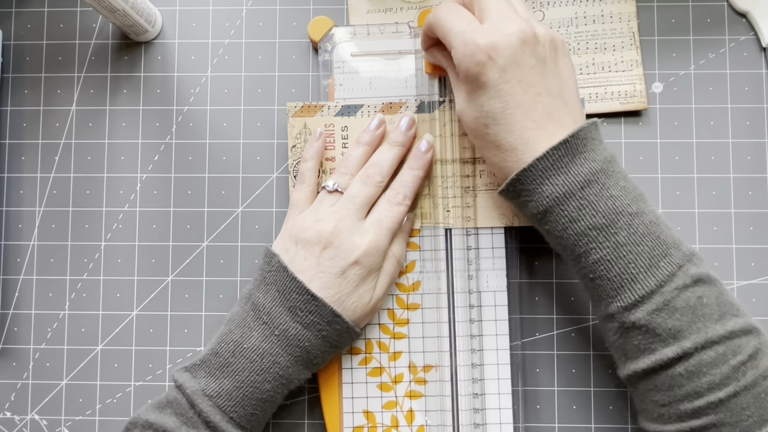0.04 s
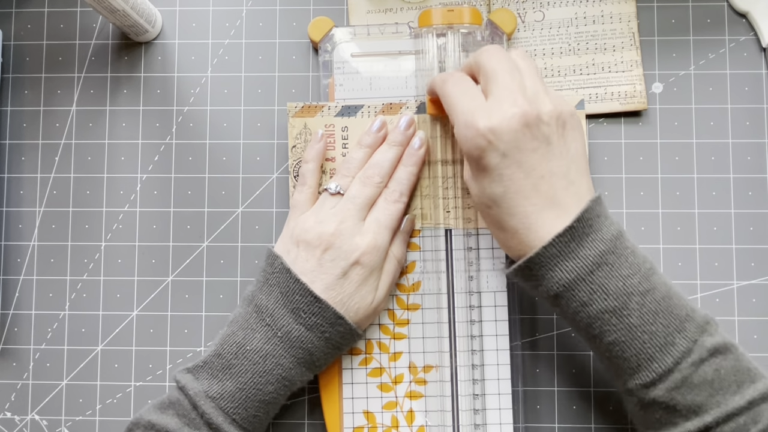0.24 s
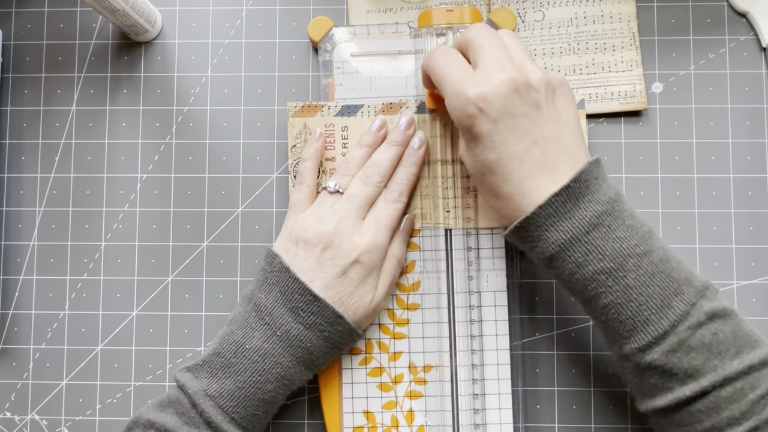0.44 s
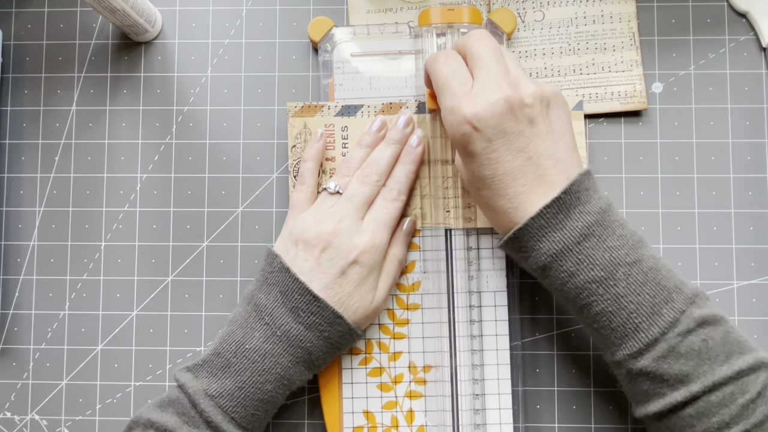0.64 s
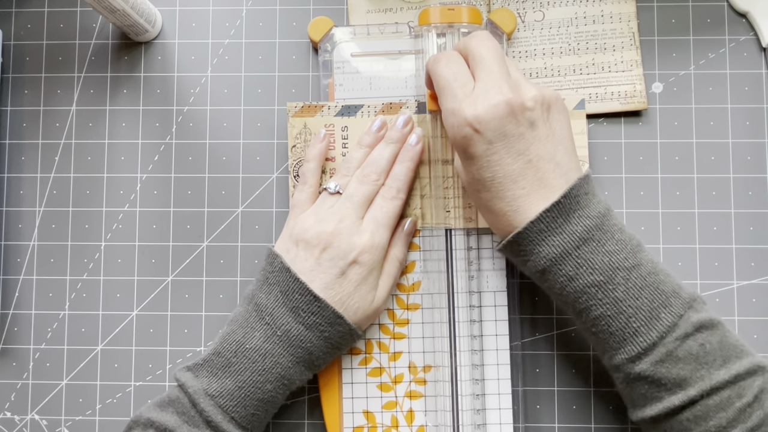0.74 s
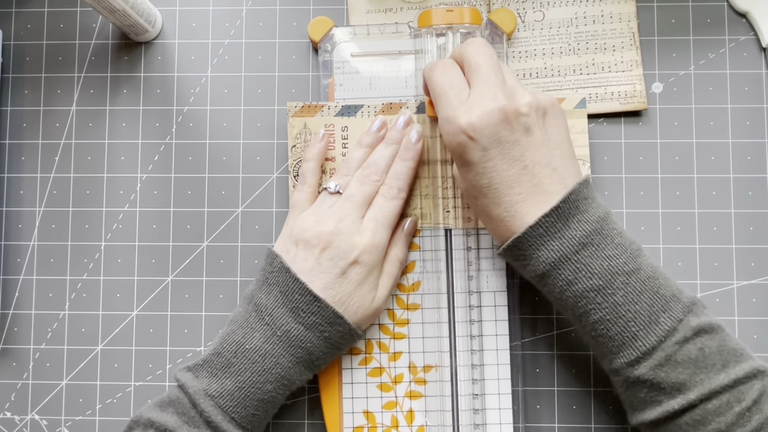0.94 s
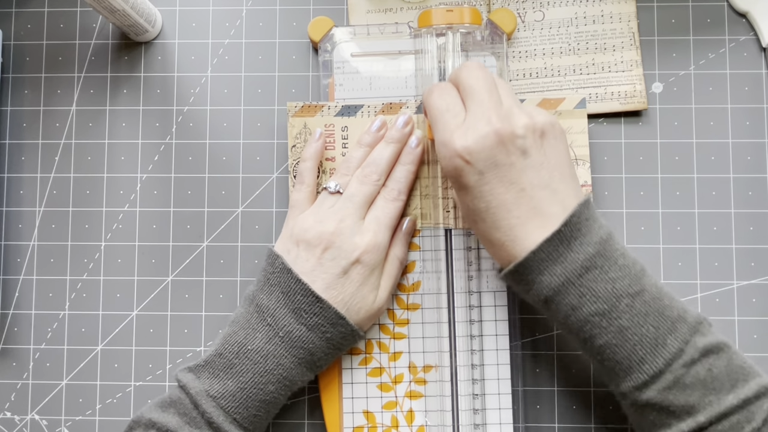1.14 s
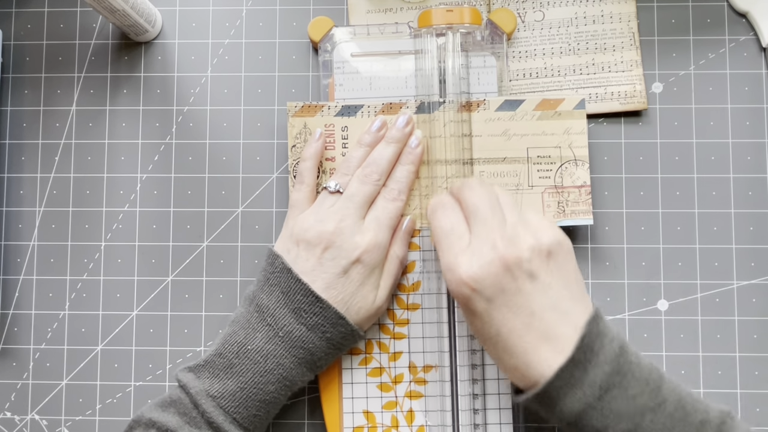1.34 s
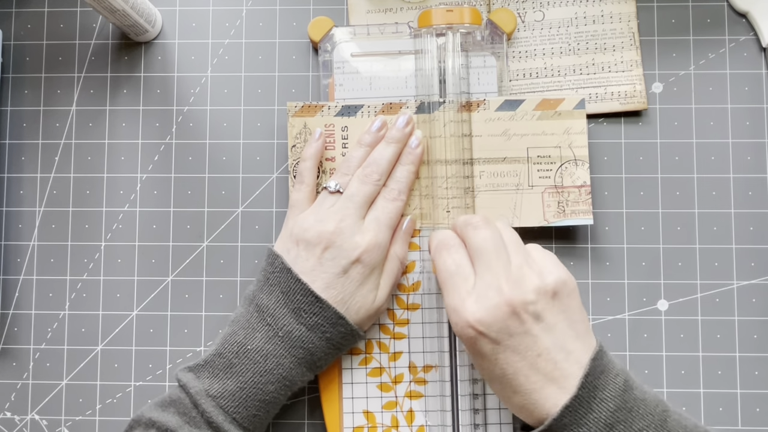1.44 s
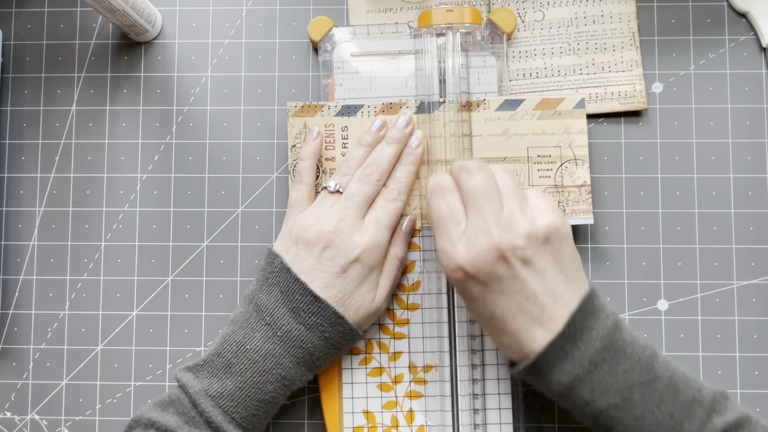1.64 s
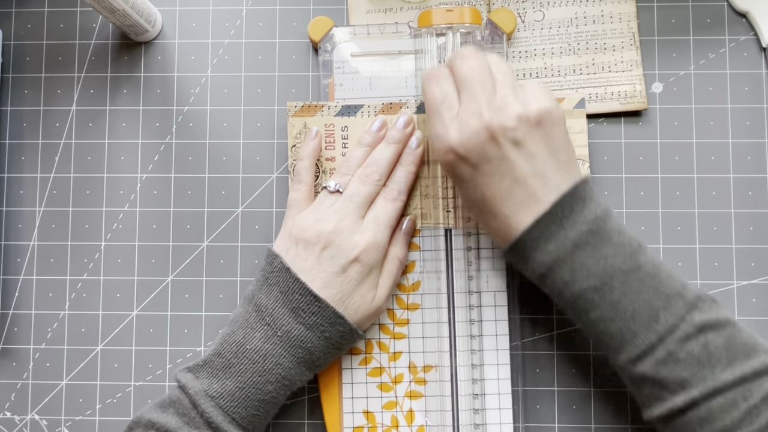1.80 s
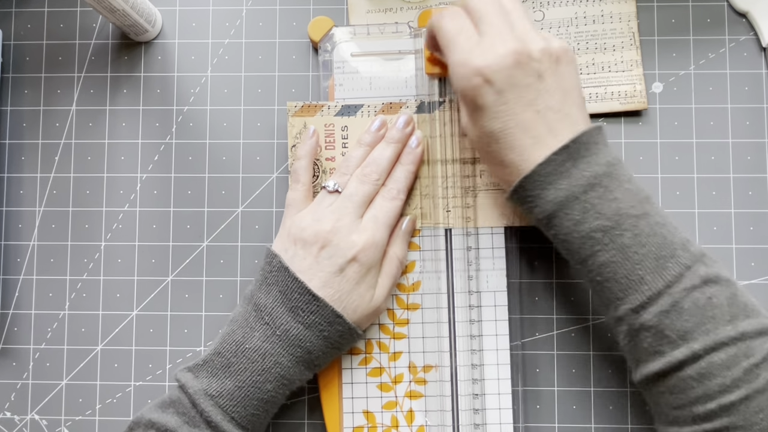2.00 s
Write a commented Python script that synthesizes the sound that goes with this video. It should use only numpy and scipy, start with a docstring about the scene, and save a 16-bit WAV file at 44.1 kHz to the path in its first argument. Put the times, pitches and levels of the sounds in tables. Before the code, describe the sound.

A paper trimmer's plastic carriage clacks into place with scattered knocks, then rasps through a sheet in one swelling, hissing stroke, and rattles back with more knocks; close stereo in a quiet room.

```python
"""Paper trimmer on a craft table

Close stereo. Fingers knock the blade carriage into place; it rasps down its rail through a sheet of
paper and slides back rattling. Knocks, slips and rattles excite ringing modes of the plastic base; jolts
ring the table top and send a falling bending wave through it. Filtered grains make the hiss of blade
and paper, noise bursts the dry clicks; sparse reflections and a low room rumble surround it all."""
import sys
import numpy as np
from scipy import signal
from scipy.fft import rfft, irfft, next_fast_len
from scipy.io import wavfile
from scipy.ndimage import uniform_filter1d

SR = 44100
rng = np.random.default_rng(int(sys.argv[2]) if len(sys.argv) > 2 else 0)


def amplitude_ratio(level_db):
    """Convert a level in decibels to the matching linear amplitude (field) ratio."""
    exponent = np.asarray(level_db, float) / 20
    return 10 ** exponent


def digitize_waveform(pressure):
    """Quantize a signal to 16-bit integers and store it at the path in sys.argv[1].

    Rows of a 2-D input are taken as channels; values are limited to [-1, 1].
    """
    field = np.atleast_2d(pressure).T
    bounded = np.clip(field, -1, 1)
    quanta = np.round(bounded * 32767).astype(np.int16)
    wavfile.write(sys.argv[1], SR, quanta)


N = 91110

# Room rumble spectrum, before scaling to ROOM_DB: freq_hz, density_db
ROOM_SPECTRUM = [(20, -22), (50, 9.5), (120, 0), (170, -3.5), (600, -20), (1000, -40), (6000, -42)]
ROOM_DB, ROOM_APART_DB = -57, -15  # rms of the shared rumble; each side's own rumble relative to it

# Dry bright clicks, perhaps a nail or paper edge on plastic: start_s, level_db (before filtering)
CLICKS = [(0.3, -46.5), (0.55, -45), (0.58, -43), (0.684, -49.5), (.951, -46)]
CLICK_LOW_HZ, CLICK_TOP_HZ, CLICK_T60_S = 2500, 10200, 0.025  # band edges, decay

# Jolts of the table top: start_s, ringing_db, bending_wave_db
THUDS = [(.162, -45, -50), (.19, -38.5, -40), (.393, -51.5, -44), (0.489, -53, -43), (.581, -49, -48),
         (.628, -45.5, -41.5), (.845, -41.5, -40), (1.548, -45, -45), (1.826, -45, -39), (2.0, -47, -50)]
# Table-top modes: pitch_hz, relative_level_db, t60_s
TABLE_MODES = [(115, 4, 0.4), (192.4, 7.5, 0.096)]
TABLE_DETUNE = 0.048  # random relative pitch spread from jolt to jolt
BEND_FROM_HZ, BEND_TO_HZ, BEND_S = 890, 196, 0.00395  # glide of the bending wave and its time constant

# Plastic base modes: pitch_hz, relative_level_db, t60_s
BASE_MODES = [(427, -24, 0.015), (538.6, -16.5, 0.061), (696, 7, 0.011), (794.7, -1, 0.016), (963, 1, 0.01),
              (1237.6, 1.5, 0.016), (1915, 1, 0.024), (2920, -16, 0.019)]
RISE_CYCLES = 2.64  # modes swell over a few cycles, so low ones come late
RASP_HZ = 756  # centre of the modes most excited

# Knocks of carriage and rail: start_s, body_peak_db, tick_db (before colouring)
KNOCKS = [(0.013, -41.5, -69.5), (0.157, -23, -47), (0.18, -21.5, -43), (0.274, -35, -64.5),
          (0.33, -26.5, -67), (0.389, -36, -58), (0.432, -42, -64.5), (0.455, -38, -70),
          (0.485, -32.5, -60), (0.576, -35.5, -85), (0.622, -34.5, -57.5), (0.837, -21, -44.5),
          (0.86, -23.5, -43), (0.889, -22.5, -51.5), (1.542, -30, -74), (1.577, -39, -54),
          (1.643, -38, -99), (1.695, -28, -66), (1.731, -42, -67), (1.76, -26, -95), (1.801, -32.5, -61),
          (1.824, -22.5, -65), (1.96, -44, -76), (2.002, -26.5, -55.5), (2.028, -33.5, -52)]
# Colour of the knock ticks: freq_hz, gain_db
TICK_COLOUR = [(1500, 24), (3000, 19.5), (6500, 12), (15500, -9)]
TICK_T60_S, TICK_RISE_S = 0.024, 0.00071
CONTACT_S, BOUNCE_S = 0.00018, 0.003004  # width of each push, earliest bounce
SPOT_DB = 4.5  # random spread of each mode's level from knock to knock
DULLING_DB = 0.58  # fall per octave squared above RASP_HZ, per dB that the tick lies under the body

# Sliding carriage: time_s, base_rumble_db, blade_and_paper_hiss_db
SLIDE = [(0, -61, -66.5), (0.144, -66.5, -54.5), (.22, -54.5, -76), (.52, -66, -85), (0.687, -60.5, -69.5),
         (0.768, -94, -90), (0.833, -56, -58), (0.941, -55, -65), (1.103, -43.5, -48), (1.199, -40.5, -41),
         (1.354, -35, -38.5), (1.356, -48, -47), (1.41, -51, -53.5), (1.464, -71.5, -76), (1.529, -61, -60),
         (1.598, -49, -53), (1.742, -47.5, -46.5), (1.902, -58.5, -57), (1.98, -64, -72.5),
         (2.066, -58, -63)]
# Colour of the blade and paper hiss: freq_hz, gain_db
HISS_COLOUR = [(1000, 1), (2000, -0.5), (3200, -2), (6500, -4), (7700, 2), (10500, -7), (13500, -11),
               (15800, -14)]
CUT_START_S, CUT_END_S = .83, 1.5
SLIPS_PER_S, SLIP_SPREAD_DB, RASP_FOCUS_DB = 5000, 1.5, 9.5  # focus: fall per octave squared off RASP_HZ
RATTLES_PER_S, RATTLE_SPREAD_DB, RATTLE_FOCUS_DB = 150, 4, 16
TABLE_SHAKE_DB = -12.5  # table response relative to base response during the cut
JUDDER_HZ, JUDDER_DB, FLICKER_DB = 75, 1, 1.76  # one wandering curve: its speed, depth on slips and on hiss
FIBRES_PER_S, FIBRE_SPREAD_DB, PATCH_DB = 15000, -3.5, 4.5

# Colour of nearby reflections: freq_hz, gain_db
ECHO_COLOUR = [(1000, -13), (2500, -4), (5000, -2), (6400, 0), (7600, -20)]
ECHO_T60_S = 0.18
# Phase by which the left side leads: freq_hz, lead_rad
LEFT_LEAD = [(0, 0), (1800, .45), (4000, 1.7), (5400, 1.5), (6300, 0), (7600, -2.95), (9000, -3.35),
             (10700, -6.05), (12600, -6.5), (14300, -9.42)]
# Left level minus right level: freq_hz, difference_db
LEFT_OVER_RIGHT = [(2000, 1.5), (5000, 2.5), (8000, 0)]


def evened(x):
    """Scales to rms 1."""
    return x / np.sqrt(np.mean(x ** 2) + 1e-20)


def coloured(x, gain):
    """Applies gain(Hz) over the whole spectrum."""
    size = next_fast_len(x.shape[-1] + 2048)
    spectrum = rfft(x, size) * gain(np.fft.rfftfreq(size, 1 / SR))
    return irfft(spectrum, size)[..., :x.shape[-1]]


def shape(points):
    """Gain curve through (Hz, dB) points, straight in dB over log frequency."""
    f, db = np.transpose(points)
    return lambda hz: amplitude_ratio(np.interp(np.log(hz + 1), np.log(f + 1), db))


def ring(hz, db, t60):
    """Sum of sine modes that swell and die."""
    t = np.arange(SR // 4)[:, None] / SR
    decay = amplitude_ratio(db - 60 * t / np.maximum(t60, .003))
    swell = 1 - np.exp(-t * hz / RISE_CYCLES)
    return (decay * swell * np.sin(2 * np.pi * hz * t)).sum(1)


def grains(per_s, spread_db):
    """Random single-sample impulses of either sign and uneven strength, rms 1."""
    present = rng.random(N) < per_s / SR
    strength = amplitude_ratio(spread_db * np.minimum(rng.exponential(1, N), 5))
    return evened(present * rng.choice([-1., 1.], N) * strength)


def wander(hz):
    """Low-passed noise of rms 1, a randomly drifting curve."""
    return evened(coloured(rng.standard_normal(N), lambda f: 1 / (1 + (f / hz) ** 2)))


def add(mix, s, sound):
    """Mixes a sound in at s seconds."""
    part = mix[round(s * SR):][:len(sound)]
    part += sound[:len(part)]


def room_rumble():
    """Three independent stretches of low noise: left, right and shared."""
    return amplitude_ratio(ROOM_DB) * evened(coloured(rng.standard_normal((3, N)), shape(ROOM_SPECTRUM)))


def echoes(x):
    """Reflections as sparse decaying taps of random sign, other ones for each side."""
    taps = np.zeros((2, SR // 4))
    slots = np.arange(60, SR // 4 - 20, 20)
    at = slots + rng.integers(0, 20, (2, len(slots)))
    sizes = rng.choice([-1., 1.], at.shape) * amplitude_ratio(-60 * at / SR / ECHO_T60_S)
    np.put_along_axis(taps, at, sizes, 1)
    taps /= np.linalg.norm(taps[0])
    return coloured(signal.fftconvolve(x[None], taps, axes=1)[:, :N], shape(ECHO_COLOUR))


def clicks():
    """Very short, band-limited noise bursts that die exponentially."""
    out, t = np.zeros(N), np.arange(1024) / SR
    for s, db in CLICKS:
        add(out, s, amplitude_ratio(db - 60 * t / CLICK_T60_S) * rng.standard_normal(len(t)))
    return coloured(out, lambda f: 1 / (1 + (CLICK_LOW_HZ / (f + 1)) ** 2) / (1 + (f / CLICK_TOP_HZ) ** 2))


def thuds():
    """The table top rings low, a little differently for each jolt; a bending wave brings its highs first."""
    hz, db, t60 = np.transpose(TABLE_MODES)
    out = np.zeros(N)
    t = np.arange(SR // 20) / SR / BEND_S  # in time constants
    turns = BEND_S * (BEND_TO_HZ * t + (BEND_FROM_HZ - BEND_TO_HZ) * (1 - np.exp(-t)))
    swell = t * np.exp(1 - t)  # peaks at 1
    for s, thud_db, bend_db in THUDS:
        detune = 1 + TABLE_DETUNE * rng.standard_normal(len(hz))
        add(out, s, ring(hz * detune, db + thud_db, t60))
        add(out, s, amplitude_ratio(bend_db) * swell * np.sin(2 * np.pi * turns + rng.standard_normal()))
    return out


def knocks():
    """A light touch, a push and a bounce ring the base under a bright tick; dull knocks lose upper modes."""
    hz, db, t60 = np.transpose(BASE_MODES)
    octaves_above = np.log2(np.maximum(hz / RASP_HZ, 1))
    out, ticks, t = np.zeros(N), np.zeros(N), np.arange(4096) / SR
    tick_envelope = amplitude_ratio(-60 * t / TICK_T60_S) * (1 - np.exp(-t / TICK_RISE_S))
    for s, body_db, tick_db in KNOCKS:
        push_at, bounce_at, bounce_size = rng.random(3)
        contacts = [(0, .2), (BOUNCE_S * (1 + push_at) / 2, -1), (BOUNCE_S * (1 + bounce_at), bounce_size)]
        push = sum(size * np.exp(-((t - late) / CONTACT_S - 2) ** 2) for late, size in contacts)
        spot = SPOT_DB * rng.standard_normal(len(hz))
        dulling = DULLING_DB * (body_db - tick_db) * octaves_above ** 2
        body = signal.fftconvolve(np.diff(push), ring(hz, db + spot - dulling, t60))
        add(out, s, amplitude_ratio(body_db) * body / abs(body).max())
        add(ticks, s, amplitude_ratio(tick_db) * rng.standard_normal(len(t)) * tick_envelope)
    return out + coloured(ticks, shape(TICK_COLOUR))


def rasp(base_level, cutting, judder):
    """During the cut, dense uneven slips drive base and table."""
    hz, db, t60 = np.transpose(BASE_MODES)
    base = ring(hz, db - RASP_FOCUS_DB * np.log2(hz / RASP_HZ) ** 2, t60)
    table = ring(*np.transpose(TABLE_MODES))
    body = base / np.linalg.norm(base) + amplitude_ratio(TABLE_SHAKE_DB) * table / np.linalg.norm(table)
    slips = grains(SLIPS_PER_S, SLIP_SPREAD_DB) * base_level * amplitude_ratio(JUDDER_DB * judder)
    return signal.fftconvolve(slips * cutting, body)[:N]


def rattle(base_level, cutting):
    """Before and after the cut, sparse hits of the loose carriage ring the base modes twice as long."""
    hz, db, t60 = np.transpose(BASE_MODES)
    loose = ring(hz, db - RATTLE_FOCUS_DB * np.log2(hz / RASP_HZ) ** 2, 2 * t60)
    hits = grains(RATTLES_PER_S, RATTLE_SPREAD_DB) * base_level * ~cutting
    return signal.fftconvolve(hits, loose / np.linalg.norm(loose))[:N]


def fibre_hiss():
    """Tearing fibres and rubbing plastic: dense grains, uneven in drifting patches of time and pitch."""
    hiss = coloured(grains(FIBRES_PER_S, FIBRE_SPREAD_DB), shape(HISS_COLOUR))
    z = signal.stft(hiss, nperseg=512, noverlap=384)[2]
    patches = uniform_filter1d(rng.standard_normal(z.shape), size=4, axis=0)  # across pitch
    patches = evened(uniform_filter1d(patches, size=16, axis=1))  # across time
    return evened(signal.istft(z * amplitude_ratio(PATCH_DB * patches), nperseg=512, noverlap=384)[1][:N])


def slide():
    """The carriage rasps or rattles along its rail, with hiss whose level shares the judder of the slips."""
    s, base_db, hiss_db = np.transpose(SLIDE)
    t = np.arange(N) / SR
    judder = wander(JUDDER_HZ)
    cutting = (t > CUT_START_S) & (t < CUT_END_S)
    base_level = amplitude_ratio(np.interp(t, s, base_db))
    hiss_level = amplitude_ratio(np.interp(t, s, hiss_db) + FLICKER_DB * judder)
    return rasp(base_level, cutting, judder) + rattle(base_level, cutting) + fibre_hiss() * hiss_level


def stereo_ports(x):
    """Splits the direct sound over two microphone ports by phase lead and level difference."""
    f, lead = np.transpose(LEFT_LEAD)
    side = np.array([[.5], [-.5]])  # half the difference to each side
    level = shape(LEFT_OVER_RIGHT)
    return coloured(x[None], lambda hz: level(hz) ** side * np.exp(1j * side * np.interp(hz, f, lead)))


def scene():
    """Direct sound at both ports, with reflections and some room rumble that differ per side."""
    room = room_rumble()
    direct = room[2] + clicks() + thuds() + knocks() + slide()
    return stereo_ports(direct) + echoes(direct) + amplitude_ratio(ROOM_APART_DB) * room[:2]


def low_pass(x):
    """Removes everything above the highest recorded frequency."""
    return signal.sosfilt(signal.butter(12, 15940, fs=SR, output="sos"), x)


def record(dry):
    """Delivers the finished stereo mix."""
    return low_pass(dry)


dry = scene()
out = record(dry)
digitize_waveform(out)
```